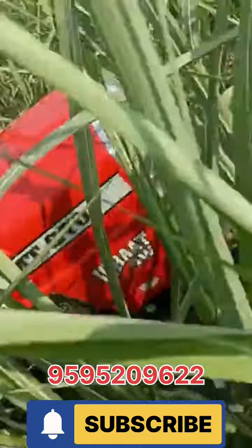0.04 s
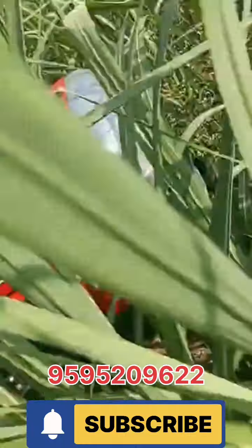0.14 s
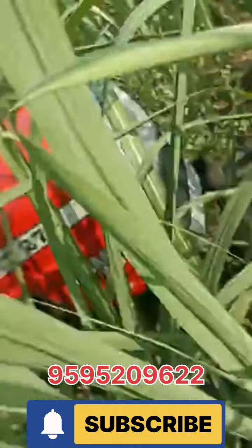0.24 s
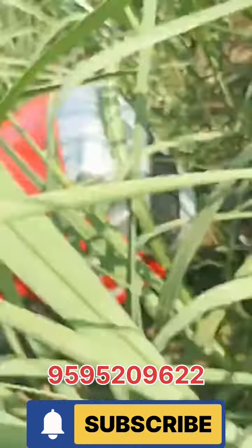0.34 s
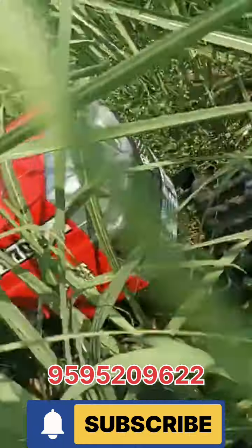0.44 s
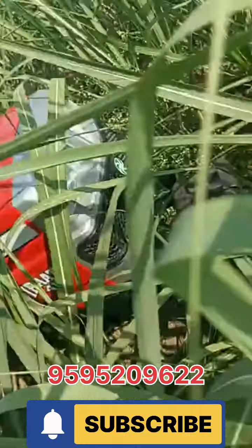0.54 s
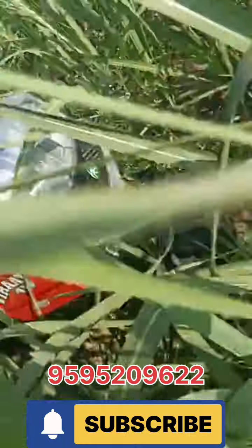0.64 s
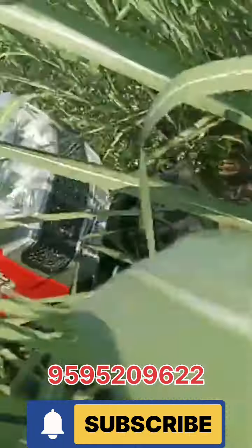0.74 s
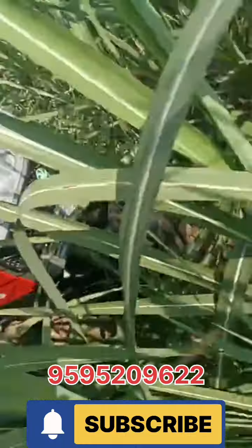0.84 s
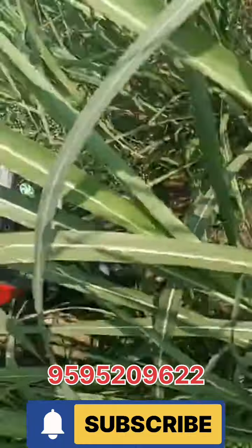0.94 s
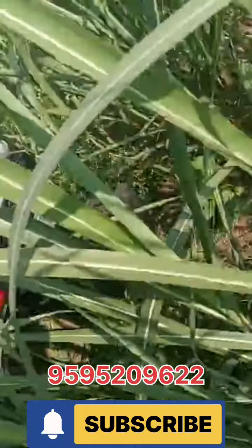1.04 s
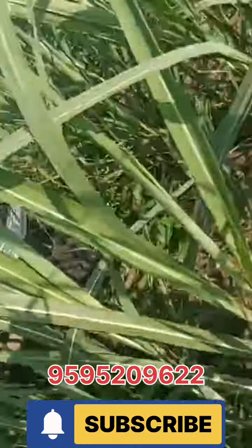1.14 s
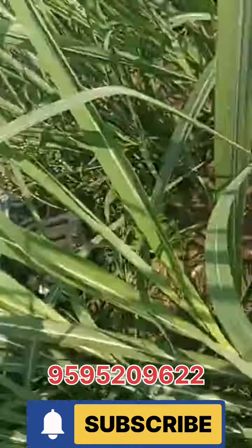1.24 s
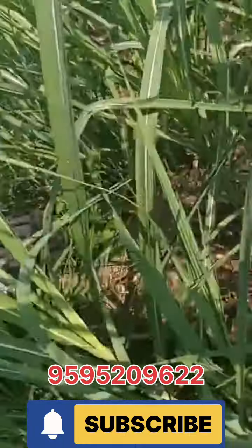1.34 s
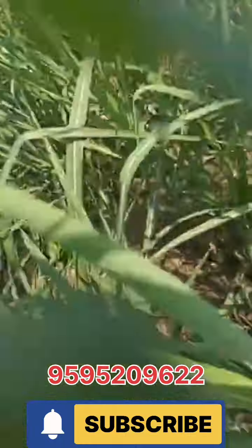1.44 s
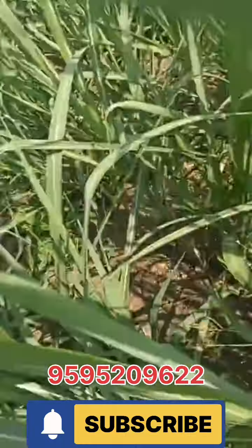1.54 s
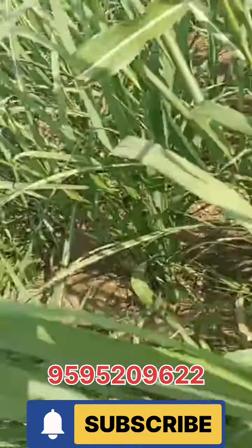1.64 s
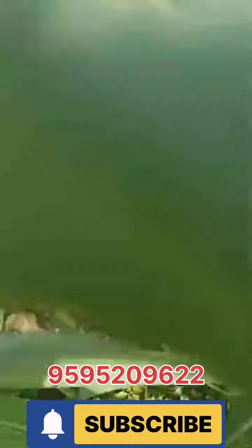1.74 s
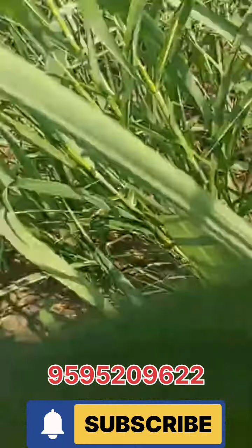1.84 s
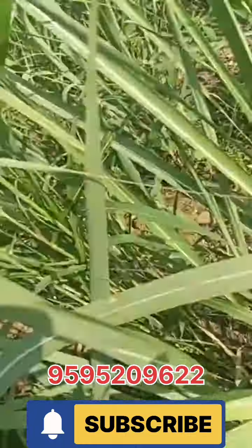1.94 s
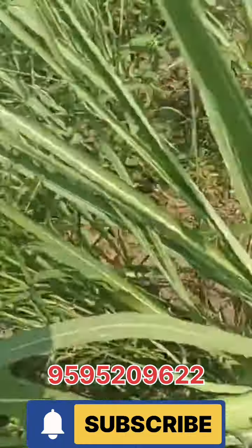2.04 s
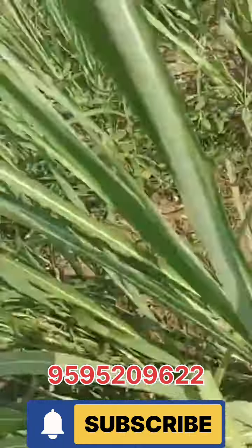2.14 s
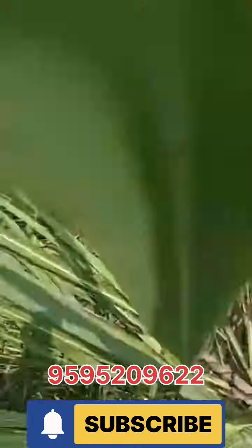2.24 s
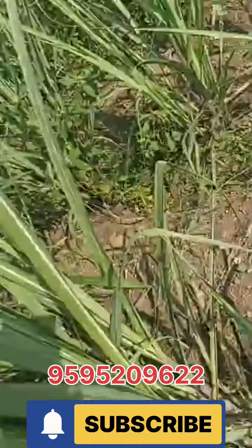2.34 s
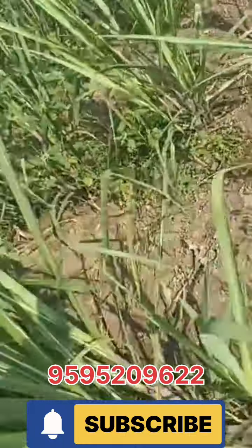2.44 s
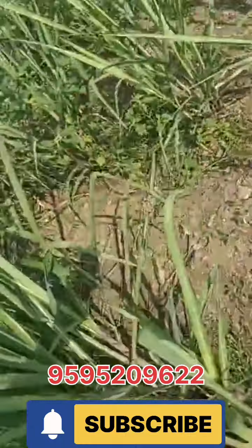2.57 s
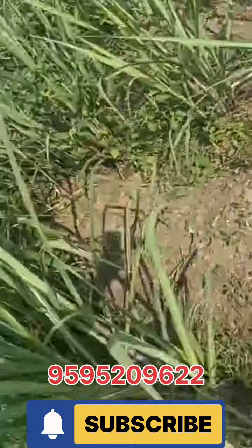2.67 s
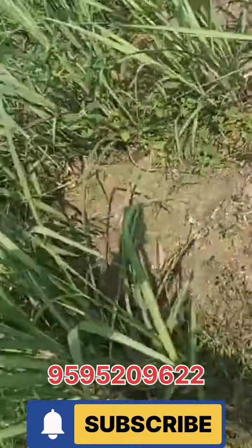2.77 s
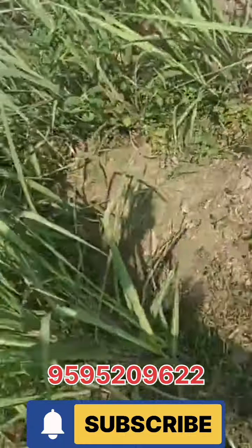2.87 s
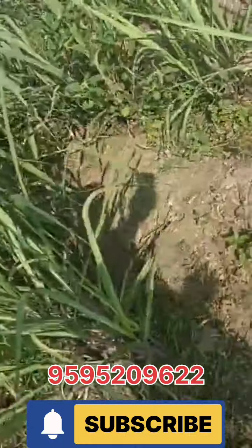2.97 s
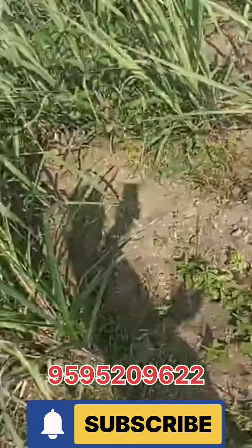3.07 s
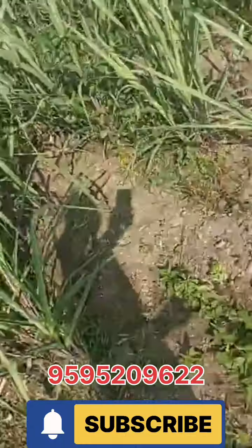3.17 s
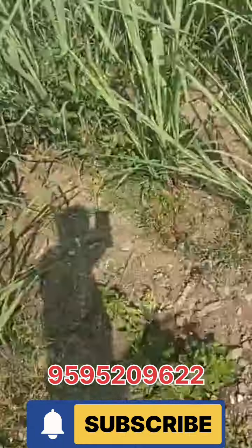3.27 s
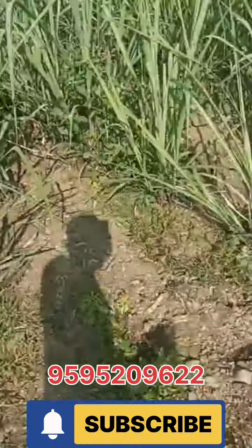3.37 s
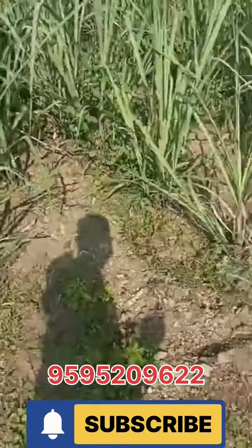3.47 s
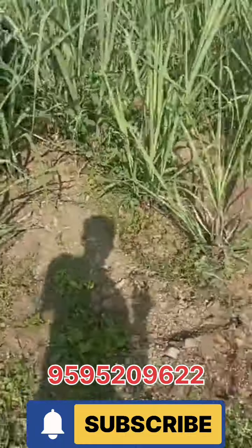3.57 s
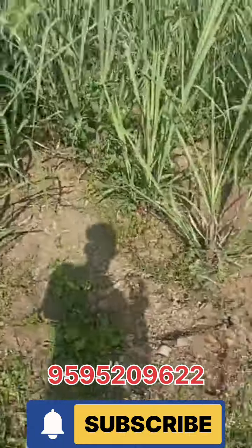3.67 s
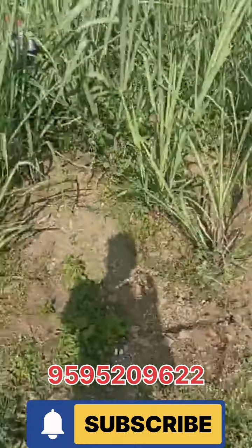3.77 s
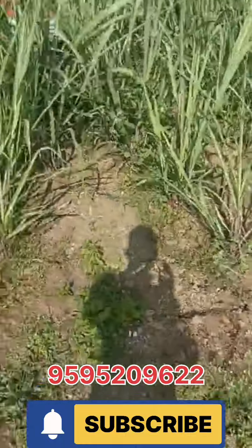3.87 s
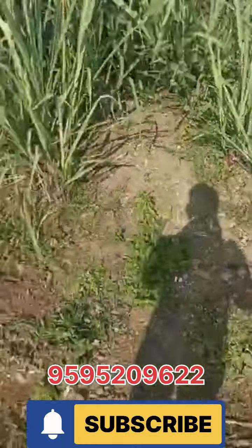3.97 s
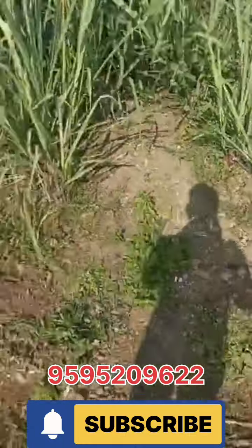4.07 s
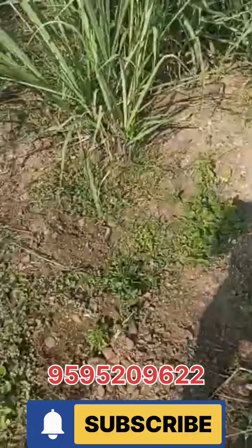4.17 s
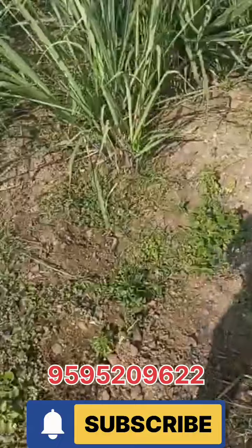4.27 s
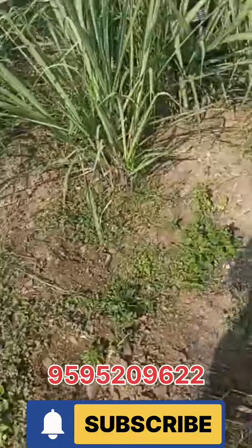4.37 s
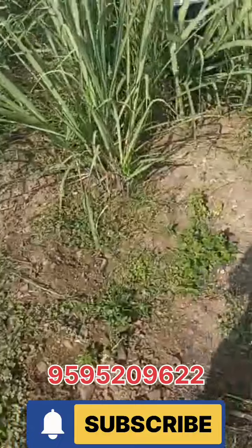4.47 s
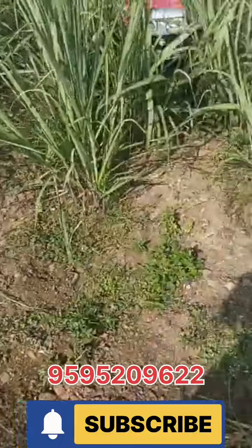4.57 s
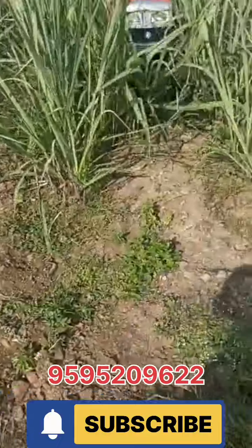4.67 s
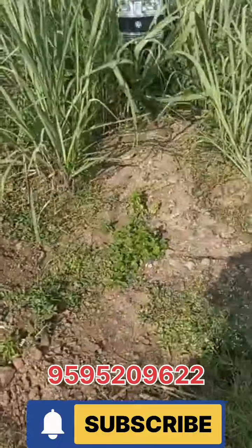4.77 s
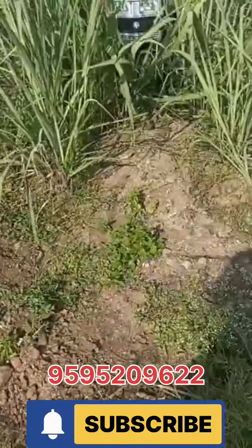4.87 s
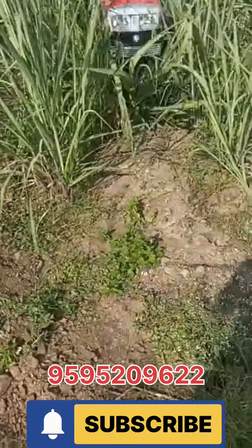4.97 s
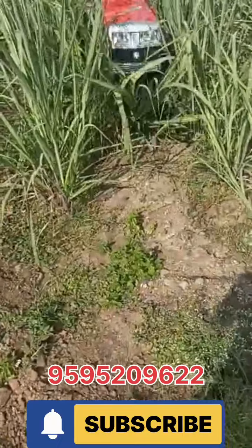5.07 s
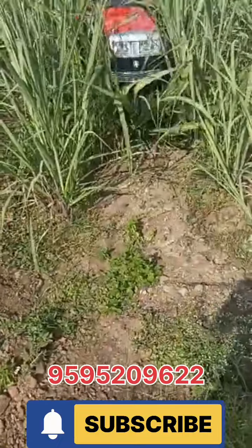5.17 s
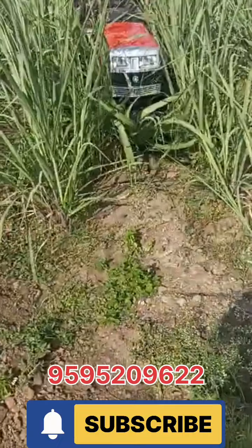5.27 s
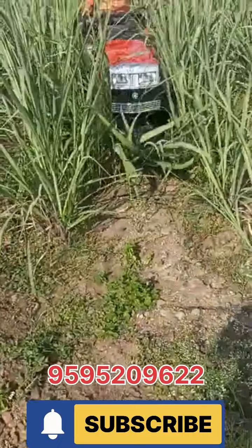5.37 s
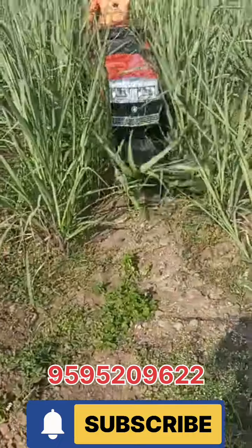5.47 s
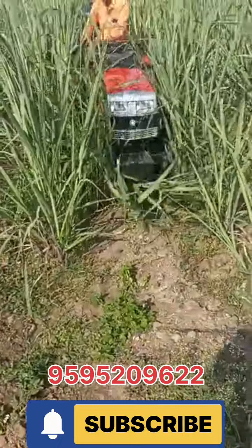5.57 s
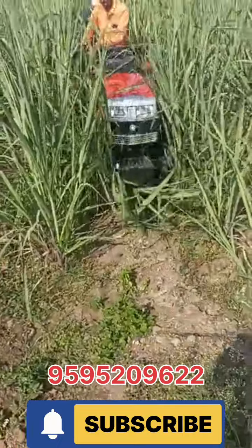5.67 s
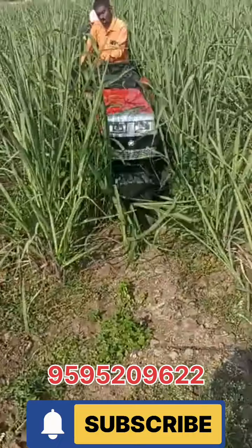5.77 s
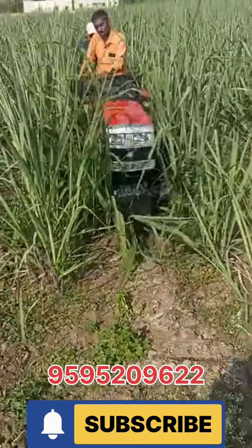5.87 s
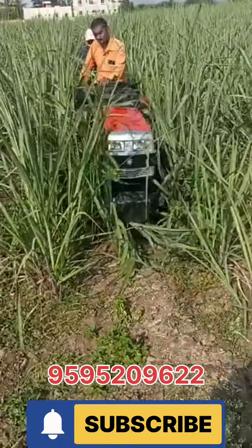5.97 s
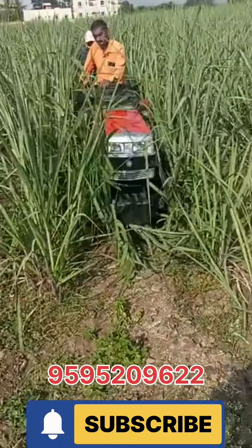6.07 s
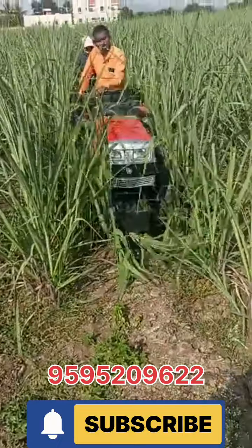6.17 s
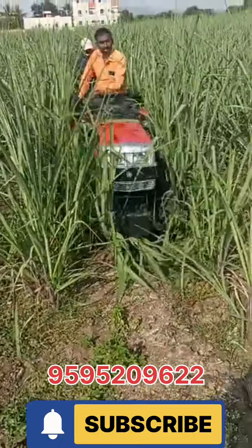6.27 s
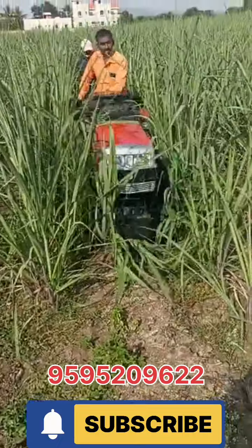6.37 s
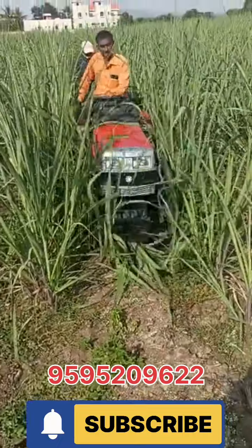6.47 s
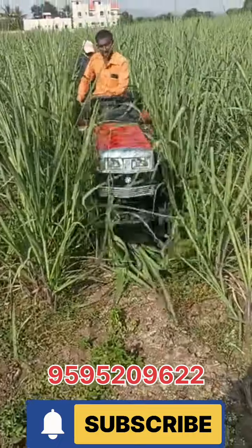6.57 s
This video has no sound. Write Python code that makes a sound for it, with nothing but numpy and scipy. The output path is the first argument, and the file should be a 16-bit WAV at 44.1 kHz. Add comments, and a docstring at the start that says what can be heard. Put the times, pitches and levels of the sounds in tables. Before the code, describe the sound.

A small diesel tractor drones and knocks steadily as rough leaves scrape past, the sound cut by brief silences.

```python
"""In a field of tall cane, a small four-cylinder diesel tractor works its way through the crop.
Its cylinders knock in turn, the exhaust drones, and the fan and gears whine over them.
The listener starts beside the engine, where rough leaves scrape past, then moves out in front.
Stalks and ground colour the sound on its way. It comes in five stretches with silence between them."""
import sys
import numpy as np
from scipy import signal
from scipy.fft import rfft, irfft
from scipy.io import wavfile
from scipy.ndimage import uniform_filter1d

SR = 44100
rng = np.random.default_rng(int(sys.argv[2]) if len(sys.argv) > 2 else 0)


def unload_wav(signal):
    """Save mono or channel-first audio to the path in sys.argv[1] as 16-bit WAV at rate SR, clipped to [-1, 1]."""
    wavfile.write(
        sys.argv[1],
        SR,
        np.round(np.clip(np.atleast_2d(signal).T, -1, 1) * 32767).astype(np.int16),
    )


N = 291942
TIME = np.arange(N) / SR
BINS_HZ = np.fft.rfftfreq(N, 1 / SR)

# The loudest leaf swishes and snaps: start_s, length_s, centre_hz, width_octaves, left_db, right_db
LEAF_STROKES = [(0.391, 0.16, 7900, 0.64, -19, -16), (0.86, .04, 6400, 2.7, -30, -22),
                (.877, .09, 3000, 0.24, -38.5, -20.5), (0.946, 0.18, 3960, 0.25, -40, -23),
                (1.188, .14, 6070, 1.3, -18, -21), (1.305, .14, 12700, .55, -18.5, -18.5),
                (1.462, 0.036, 4960, 3.5, -23, -34), (1.783, 0.026, 2185, .75, -15, -25),
                (1.805, 0.11, 7500, 3, -20.5, -22.5), (1.897, .013, 11530, 1.2, -19, -34),
                (1.948, 0.074, 6400, 0.75, -31, -23), (3.344, .48, 8940, 1.6, -39, -29.5),
                (4.024, 0.35, 2970, 0.8, -46, -29), (4.891, .014, 3880, 1.3, -21.5, -33.5),
                (6.148, .32, 7900, 1.2, -34, -32)]
# Typical level of a light brush of leaves: left_db, right_db
BRUSH_DB = (-34, -28.5)
# The listener's walk: time_s, place, engine_db
# Places: 0 beside the engine, 1 in the cane, 2 field edge, 3 ahead, 4 or more head on
LISTENER_WALK = [(.3, 0, -0.1), (.9, 0.07, -0.95), (1.5, .5, -0.5), (1.802, 0.78, -1.3), (2.47, 1.02, -1),
                 (2.75, 2.3, 0), (3.75, 2.5, -1.35), (4.03, 2.5, -1.66), (5.5, 3.5, -1.5), (5.8, 6, -3),
                 (6.25, 4, -1.5)]
# Tone colour of the knock at each of the five places: pitch_hz, left_db, right_db
COLOUR_BESIDE = [(30.0, -16, -10.5), (49.3, -13, -10), (80.9, 2, -4.5), (133.0, -5.5, 0.5), (151, 1, 4.5),
                 (241, 3, 1.5), (730, -4, -0.5), (1350, -4, -9.5), (1400, -7, -8), (2148, -3.5, -3),
                 (2400, -6.5, -0.5), (6350.0, -12, -13), (7710, -12.5, -10.5), (15500.0, -15, -13)]
COLOUR_IN_CANE = [(30.65, -21, -7), (48.9, -23.5, -17.5), (60.1, 0, -2.5), (144, -5, -1.5), (276, -9.5, -9),
                  (508, 0, -1), (854, -10, -5.5), (1077, -4.5, -6.5), (1500, -13, -11.5), (1710, -9, -8.5),
                  (3135, -14.5, -9.5), (3800, -16, -14.5), (8550.0, -19.5, -20), (15500.0, -21.5, -18)]
COLOUR_FIELD_EDGE = [(30.0, -23.0, -22.0), (147.0, -5.0, -5.0), (324.0, -12.0, -12.0), (436.0, -7.0, -9.0),
                     (717.0, -7.0, -6.0), (874.0, -13.0, -11.0), (1070.0, -6.0, -8.0),
                     (1580.0, -15.0, -14.0), (2130.0, -14.0, -14.0), (2600.0, -8.0, -8.0), (3600, -18, -17),
                     (5500, -21, -22), (9000, -22, -23), (15000, -24, -31)]
COLOUR_AHEAD = [(30.0, -22.0, -21.0), (147.0, -6.0, -4.0), (266.0, -11.0, -10.0), (395.0, -14.0, -7.0),
                (532.0, -3.0, -13.0), (717.0, -7.0, -12.0), (874.0, -15.0, -12.0), (1070.0, -6.0, -11.0),
                (1300.0, -12.0, -2.0), (1580.0, -16.0, -9.0), (1930.0, -13.0, -18.0),
                (2600.0, -16.0, -15.0), (7010.0, -21.0, -24.0), (15500.0, -23.0, -27.0)]
COLOUR_HEAD_ON = [(30.0, -21.0, -21.0), (49.3, -20.0, -19.0), (60.1, -16.0, -12.0), (147.0, -5.0, -3.0),
                  (179.0, -9.0, -9.0), (358.0, -7.0, -5.0), (436.0, -15.0, -5.0), (532.0, -4.0, -12.0),
                  (717.0, -5.0, -11.0), (874.0, -13.0, -11.0), (1070.0, -6.0, -8.0), (1430.0, -12.0, -3.0),
                  (1750.0, -13.0, -14.0), (15500.0, -23.0, -24.0)]
# How far the wave on the left leads the right: pitch_hz, in_crop_rad, at_edge_rad, in_front_rad
LEFT_LEAD = [(420, 0, 0, .2), (480, 0, 0, 2.5), (620, -.2, -.3, .8), (850, .3, -.2, .3),
             (1020, .6, 2.6, 1.4), (1200, .4, 3.5, .7), (1600, 0, 3.5, 3.1), (2100, -.4, 6.2, 4.2),
             (2700, 0, 8.5, 8.5), (3900, 0, 11, 12.9)]
# Engine speed, sagging a little under load: time_s, firings_per_s
ENGINE_SPEED = [(0.0, 59.6), (0.62, 59.6), (0.85, 58.7), (1.15, 59.0), (1.8, 58.2), (2.2, 59.7),
                (3.3, 59.8), (4.1, 60.2), (4.45, 61.6), (5.4, 61.0), (6.05, 61.4), (6.62, 58.9)]
# Pitch of each exhaust, crank, fan and gear tone: multiple_of_firing_rate
TONE_MULTIPLES = [1, 2, 2.25, 2.75, 3, 3.25, 4, 4.4, 5, 7, 8.8, 10.5, 11, 21]
# Strength of those tones beside the engine, and out in the open: level_db
TONE_BESIDE_DB = [-28.5, -26.5, -51.5, -31.5, -48, -39.5, -24.5, -36, -41, -43.5, -36.5, -40.5, -46.5, -37]
TONE_OPEN_DB = [-33, -29, -53, -39, -35.5, -59, -44, -39, -48.5, -51, -37, -41, -45.5, -46.5]
# Where the engine's panels ring: pitch_hz, width_hz, boost_db
PANEL_RINGS = [(718, 27, 2.5), (2563, 37, 3), (2746, 25, 6)]
# Knock of the four cylinders in firing order: level_db
CYLINDER_KNOCK_DB = [.5, -.1, .1, -.5]
# Treble colour of the whole sound: pitch_hz, left_db, right_db
TREBLE_COLOUR = [(3520, 0.5, 0), (3600, -3.0, -2.5), (5000, -4, -3), (6830, -3.5, 2.5), (6600, -8.5, 0),
                 (8900, -7.5, -7.5), (11660, -0.5, -14), (11500, 4.5, -9), (15800.0, -6.5, -10)]
# The moment when the treble changes sides: start_s, end_s, above_hz
SIDE_SWAP = (2.94, 3.36, 5000)
# The stretches of sound between the silences: start_s, end_s
STRETCHES = [(0, 1.501), (1.789, 2.472), (2.751, 3.755), (4.027, 5.501), (5.799, 6.7)]


def amp(db):
    """Turns decibels into a gain."""
    return 10 ** (np.asarray(db) / 20)


def unit_level(x):
    """Scales a signal so that its average (rms) level is 1."""
    return x / np.sqrt(np.mean(x ** 2) + 1e-20)


def wander(rate_hz):
    """A smooth random wobble; a higher rate makes it quicker."""
    return unit_level(irfft(rfft(rng.standard_normal(N)) * np.exp(-(BINS_HZ / rate_hz) ** 2), N))


def at_pitches(rows, hz):
    """Reads each value column of a table at the given frequencies."""
    pitch_hz, *columns = np.transpose(rows)
    return np.array([np.interp(np.log(hz + 1), np.log(pitch_hz + 1), column) for column in columns])


def along_walk(values, place):
    """Blends from one place's values to the next; time becomes the last axis."""
    weights = np.maximum(1 - abs(place - np.arange(len(values))[:, None]), 0)
    return np.tensordot(np.asarray(values, float), weights, (0, 0))


def light_brushes(per_s=7, until_s=2.1, typical_s=0.16, typical_hz=8200, octaves=0.79, spread_db=3):
    """Leaves touch the listener among the stalks at loosely even times; gives rows like LEAF_STROKES."""
    rows = []
    for slot, (late, longer, higher, louder) in enumerate(rng.uniform(-1, 1, (64, 4))):
        start_s = (slot + .5 + .5 * late) / per_s
        if start_s < until_s:
            length_s = typical_s * (1 + .5 * longer)
            centre_hz = typical_hz * 2 ** (.5 * higher)
            levels_db = np.array(BRUSH_DB) + spread_db * louder
            rows.append((start_s, length_s, centre_hz, octaves, *levels_db))
    return rows


def leaves(crackle_db=2.5, clump_db=2):
    """A saw-edged leaf scrapes in clumps of tiny slips, making a short, gritty hiss."""
    grit = rng.standard_normal((2, N))
    grit *= amp(crackle_db * np.array([wander(900), wander(900)]) + clump_db * wander(39))
    out = np.zeros((2, N))
    for start_s, length_s, centre_hz, octaves, left_db, right_db in LEAF_STROKES + light_brushes():
        start = round(start_s * SR)
        span = slice(start, start + round(length_s * SR))
        slips = grit[:, span]
        size = slips.shape[1]
        hz = np.fft.rfftfreq(size, 1 / SR)
        band = np.exp(-.5 * (np.log2((hz + 1) / centre_hz) / octaves) ** 2) / np.sqrt(1 + hz / centre_hz)
        scrape = unit_level(irfft(rfft(slips) * band, size))
        soft_ends = signal.windows.tukey(size, 0.24)
        out[:, span] += amp([[left_db], [right_db]]) * scrape * soft_ends
    return out


def stalk_reflections(shape, depth_db=2):
    """Echoes off stalks and ground add and cancel in narrow bands that shift as things move."""
    slow_noise = uniform_filter1d(rng.standard_normal(shape), size=30, axis=-1)
    ripple = unit_level(uniform_filter1d(slow_noise, size=3, axis=-2))
    return unit_level(amp(depth_db * ripple))


def through_crop(knock, tones, place, frame=2048):
    """Panels, crop and ground colour the knock, and the engine's tones join it."""
    hz, frame_s, knock_bands = signal.stft(knock, SR, nperseg=frame)
    tone_bands = signal.stft(tones, SR, nperseg=frame)[2]
    place = np.interp(frame_s, TIME, place)
    ring_db = sum(db / (1 + (2 * (hz - centre) / width) ** 2) for centre, width, db in PANEL_RINGS)
    knock_bands = knock_bands * amp(ring_db[:, None]) * stalk_reflections(knock_bands.shape)
    tables = (COLOUR_BESIDE, COLOUR_IN_CANE, COLOUR_FIELD_EDGE, COLOUR_AHEAD, COLOUR_HEAD_ON)
    colour = amp(along_walk([at_pitches(rows, hz) for rows in tables], place))
    # left and right differ in balance and phase, by pitch and by place
    balance = colour / np.sqrt(np.mean(colour ** 2, axis=0))
    inside, edge, front = at_pitches(LEFT_LEAD, hz)
    lead = along_walk([inside, inside, edge, front, front], place)
    heard = (knock_bands * colour + tone_bands * balance) * np.exp(.5j * np.array([lead, -lead]))
    return signal.istft(heard, SR, nperseg=frame)[1][:, :N]


def drone_and_whine(firings, place, waver_db=0.04, drift_rad=0.044):
    """Exhaust, fan and gear tones follow the crankshaft; the higher ones waver more."""
    near = np.clip(1 - place / 1.01, 0, 1)  # the boom fades away from the engine
    out = np.zeros(N)
    for multiple, beside_db, open_db in zip(TONE_MULTIPLES, TONE_BESIDE_DB, TONE_OPEN_DB):
        phase = 2 * np.pi * multiple * firings + drift_rad * multiple * wander(13)
        level_db = open_db + (beside_db - open_db) * near - waver_db * multiple * wander(9.1)
        out += amp(level_db) * np.cos(phase)
    return np.sqrt(2) * out


def surging_rasp(knock, place, centre_hz=2600, width_hz=400, surge_db=2.8):
    """Near the edge of the field, the metallic rasp in the knock comes in uneven surges."""
    surge = unit_level(amp(surge_db * wander(14)))
    at_edge = np.exp(-(place - 2) ** 2)
    rasp = irfft(rfft(knock) * np.exp(-((BINS_HZ - centre_hz) / width_hz) ** 2), N)
    return knock + at_edge * (surge - 1) * rasp


def block_rattle(firings, repeats_below_hz=1800, grit_db=0.5):
    """Spectrum of the engine block's rattle: part repeats every four firings, part is fresh grit."""
    cycle_position = (firings / len(CYLINDER_KNOCK_DB)) % 1
    patterns = rng.standard_normal((2, 2940))
    one, other = patterns[:, (cycle_position * patterns.shape[1]).astype(int)]
    blend = wander(0.61)  # the pattern shifts slowly
    repeating = one * np.cos(blend) + other * np.sin(blend)
    fresh = unit_level(rng.standard_normal(N) * amp(grit_db * wander(830)))
    share = 0.44 / (1 + (BINS_HZ / repeats_below_hz) ** 2)
    return np.sqrt(share) * rfft(repeating) + np.sqrt(1 - share) * rfft(fresh)


def cylinder_blows(firings, uneven_db=0.8, bed=1.35, decay_firings=0.35):
    """Loudness of the knock: each firing strikes and dies away over a bed of gear and valve noise."""
    position = firings + 1.27  # start partway through a firing
    count = position.astype(int)
    blow_db = np.take(CYLINDER_KNOCK_DB, count % len(CYLINDER_KNOCK_DB))
    blow_db += uneven_db * rng.standard_normal(1000)[count]
    return unit_level(amp(blow_db) * (bed + np.exp(-(position % 1) / decay_firings)))


def diesel_knock(firings, gain_db=-6, bass_alike=0.92, treble_alike=0.043, alike_below_hz=1500):
    """The firings shake the block in pulses; left and right grow less alike towards the treble."""
    left, separate = block_rattle(firings), block_rattle(firings)
    alike = treble_alike + (bass_alike - treble_alike) / (1 + (BINS_HZ / alike_below_hz) ** 2)
    right = alike * left + np.sqrt(1 - alike ** 2) * separate
    bass_loss = amp(-3 / (1 + (BINS_HZ / 240) ** 6))  # a small block gives off little bass
    rattle = irfft(bass_loss * np.array([left, right]), N)
    return amp(gain_db) * rattle * cylinder_blows(firings)


def scene():
    """The engine, heard along the walk, and the leaves brushing past the listener and against the tractor."""
    firings_per_s = np.interp(TIME, *np.transpose(ENGINE_SPEED))
    firings = np.cumsum(firings_per_s) / SR  # running count
    walk_s, places, engine_db = np.transpose(LISTENER_WALK)
    place = np.clip(np.interp(TIME, walk_s, places), 0, 4)
    knock = surging_rasp(diesel_knock(firings), place)
    engine = through_crop(knock, drone_and_whine(firings, place), place)
    return amp(np.interp(TIME, walk_s, engine_db)) * engine + leaves()


def record(dry, tail_db=-17, tail_s=0.032, top_hz=15900):
    """Colours the treble, briefly swaps its sides, silences the gaps and removes the highest hiss."""
    spectrum = rfft(dry) * amp(at_pitches(TREBLE_COLOUR, BINS_HZ))
    swap_start_s, swap_end_s, above_hz = SIDE_SWAP
    treble = irfft(spectrum * (BINS_HZ > above_hz), N)
    swapped = (TIME > swap_start_s) & (TIME < swap_end_s)
    heard = irfft(spectrum, N) + swapped * (treble[::-1] - treble)
    gate = np.zeros(N)
    for start_s, end_s in STRETCHES:
        faint_tail = amp(tail_db) * np.clip(1 - (TIME - end_s) / tail_s, 0, 1)
        gate += (TIME >= start_s) * np.where(TIME < end_s, 1, faint_tail)
    heard *= uniform_filter1d(gate, size=60)  # smoothed so the edges do not click
    low_pass = signal.firwin(511, top_hz, window=("kaiser", 9), fs=SR)
    return signal.oaconvolve(heard, low_pass[None], "same")


dry = scene()
out = record(dry)
unload_wav(out)
```